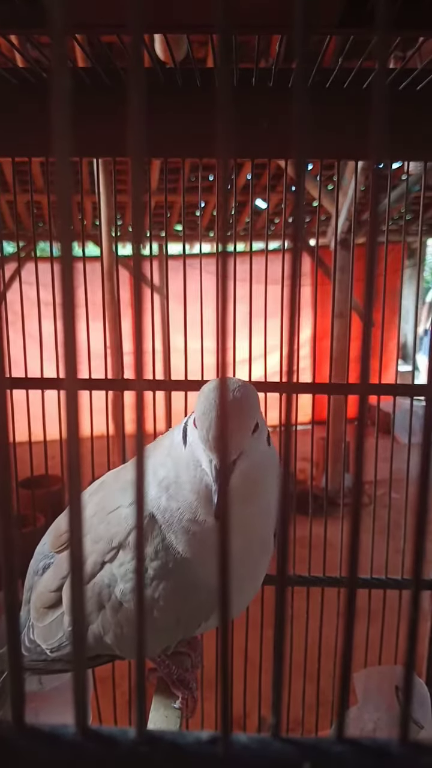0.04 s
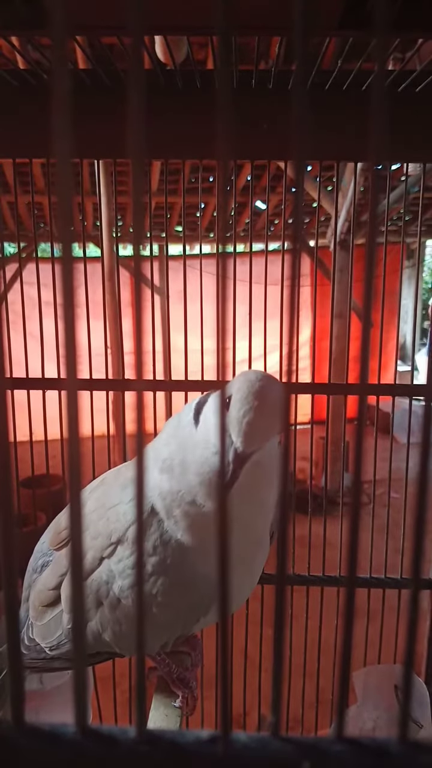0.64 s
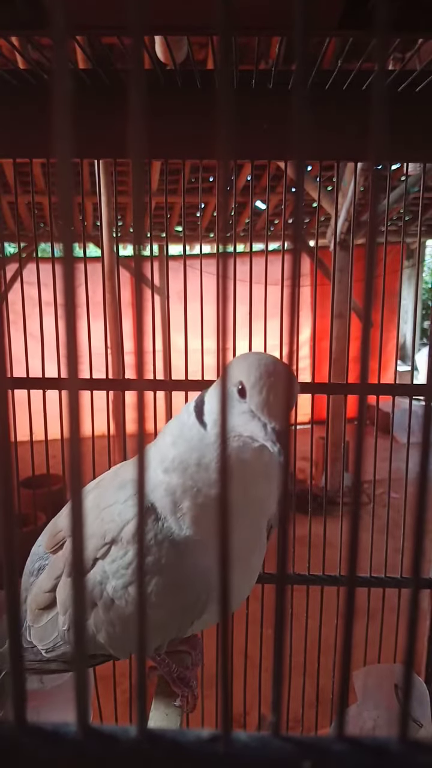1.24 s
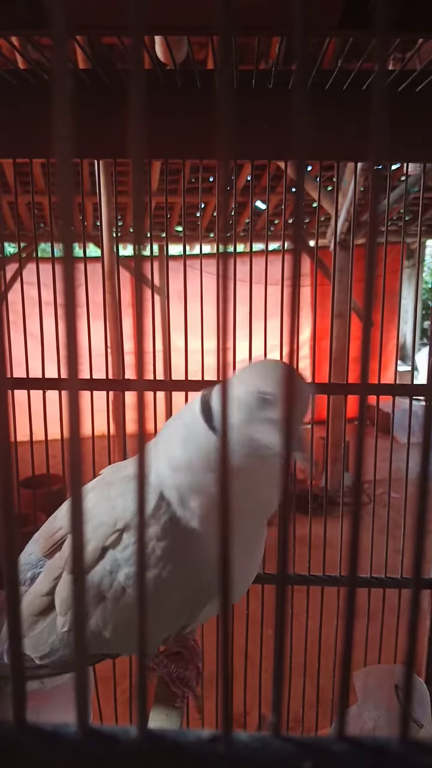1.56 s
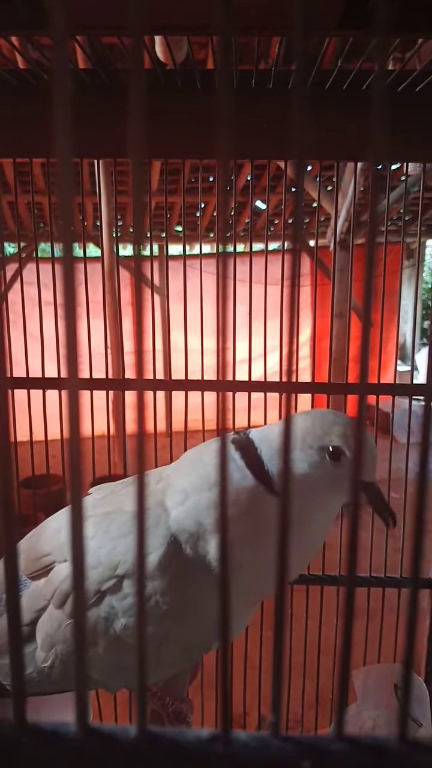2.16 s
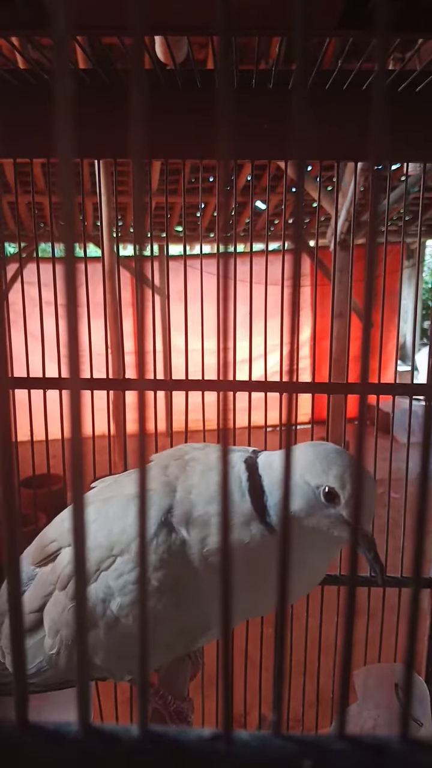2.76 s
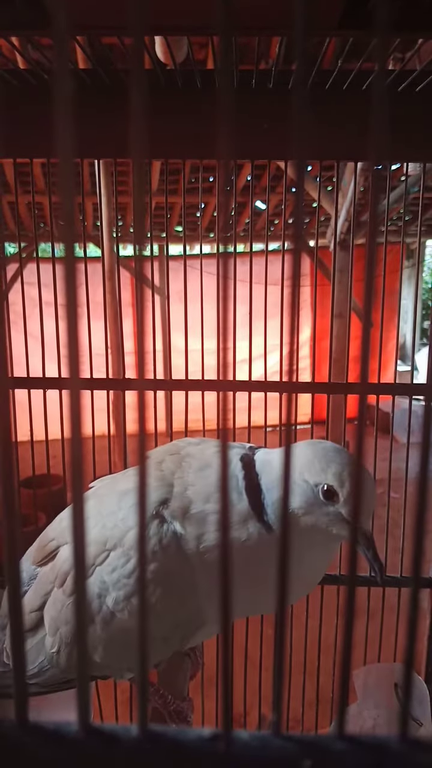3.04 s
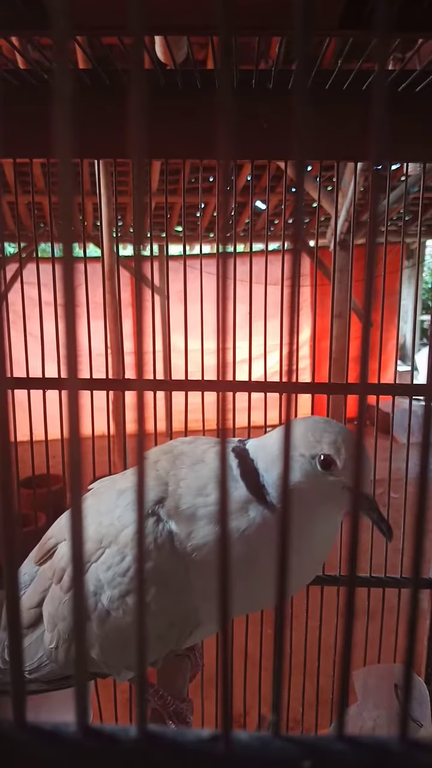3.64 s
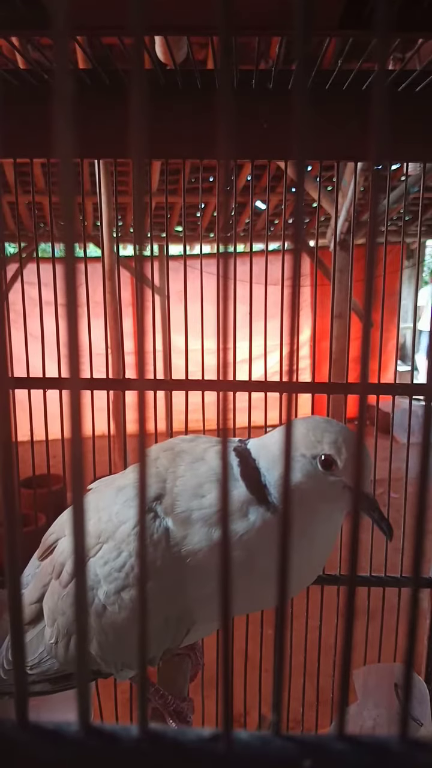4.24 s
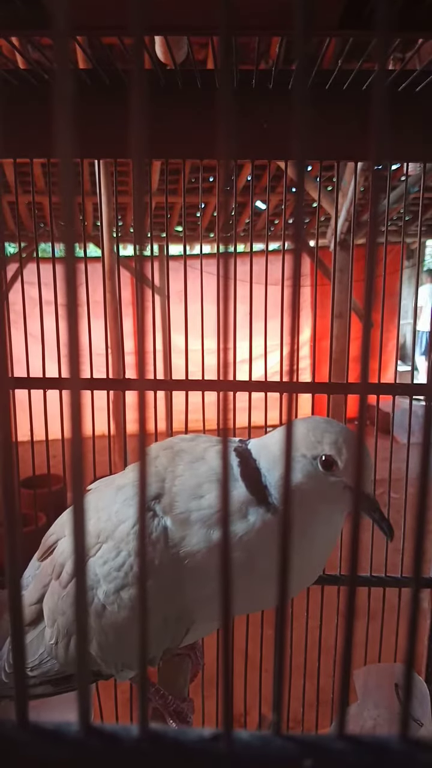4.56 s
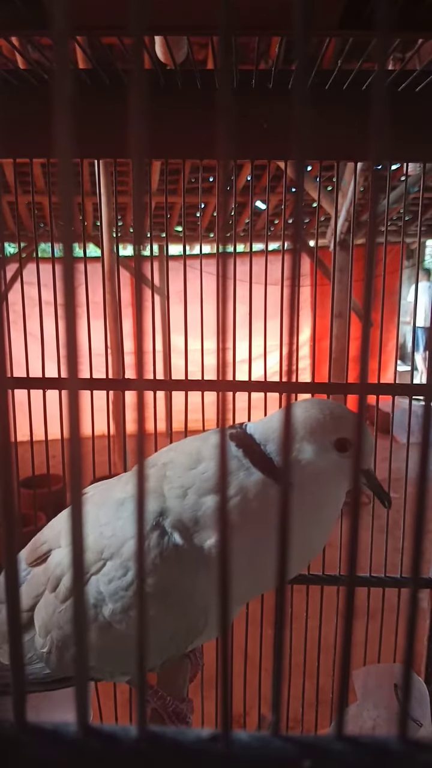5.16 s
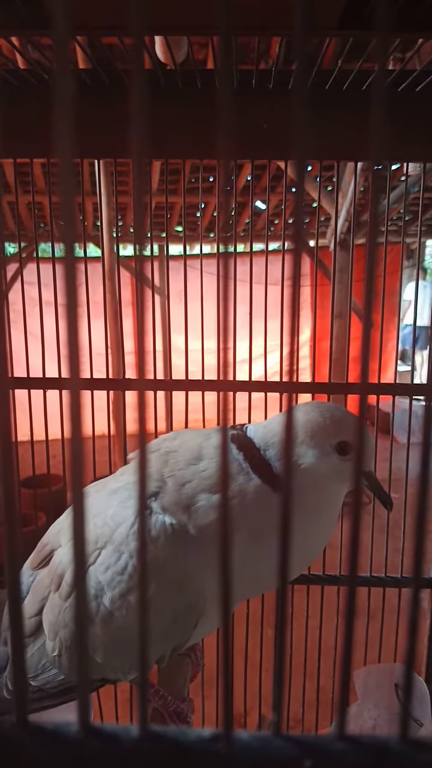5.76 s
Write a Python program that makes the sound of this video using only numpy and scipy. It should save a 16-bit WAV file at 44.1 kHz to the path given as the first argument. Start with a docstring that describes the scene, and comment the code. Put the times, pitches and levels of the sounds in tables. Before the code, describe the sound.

For the first two seconds the open shed is quiet: small birds chip, twitter and whistle a little way off, and something swishes like a broom, most clearly near 0.8 seconds. A distant engine hums faintly throughout over a low outdoor rumble. At about 2.4 seconds a caged dove, close and much louder than everything else, gives a short, round coo. A quick stutter follows around 3 seconds, then at 3.3 a long coo that breaks down at 3.7 into a low moan, sinking until about 4.6. At 5.1 comes another short coo, a stutter near 5.7, and the start of a long coo just before the end at 6 seconds. Three soft, dull knocks fall near 3.3, 4.5 and 5.8 seconds, the middle one clearest. Faint chirps and swishes continue behind the dove, whose voice has almost no echo.

```python
"""Small birds chirp and something swishes like a broom; a far engine hums throughout.
At 2.4 s a caged dove in an open shed gives a short coo, a stutter, then a long coo that breaks to a low moan.
Its nearly pure voice sounds through its inflated crop, a resonance that rings on at each leap of pitch.
From 5.1 s: another short coo, a stutter and the start of a long coo. Three dull knocks fall among the calls."""
import sys
import numpy as np
from scipy import signal
from scipy.fft import rfft, irfft, next_fast_len
from scipy.io import wavfile
from scipy.ndimage import uniform_filter1d, map_coordinates

SR = 44100
rng = np.random.default_rng(int(sys.argv[2]) if len(sys.argv) > 2 else 0)


def materialize(psi):
    """Save the field psi as 16-bit PCM at rate SR to the path in sys.argv[1].

    A 1-D psi becomes a single channel; in a 2-D psi each row is a channel.
    """
    bounded = np.clip(np.atleast_2d(psi).T, -1, 1)
    quanta = np.round(bounded * 32767).astype(np.int16)
    wavfile.write(sys.argv[1], SR, quanta)


N = 264776

# coos: leap t/s, hold/s, scoop/s, first f/Hz, last f/Hz, crest height/Hz, crest delay/s,
# crest half-width/s, effort/dB, swell/dB
COO_NOTES = [(2.453, .342, 0.036, 597, 551.3, 87, 0, .028, -13, 2.5),
             (3.332, 0.38, 0.046, 637, 603.3, 55.5, .035, 0.056, -15, 1.7),
             (5.151, .259, .025, 595.5, 560.8, 0, 0, .03, -14, 1.5),
             (5.953, .1, .029, 567, 579, 3, 0, .03, -15.5, 7)]
# stutter puffs: t/s, length/s, first f/Hz, effort/dB
PUFFS = [(2.792, 0.015, 391, -23), (3.041, .012, 376, -24), (3.074, .029, 385, -21.5),
         (3.116, .038, 376, -18.5), (3.18, 0.0098, 454, -17), (3.193, 0.047, 387, -16),
         (3.254, .023, 583, -14.5), (3.707, 0.013, 575, -13), (3.722, 0.01, 510, -12),
         (4.686, 0.0042, 400, -33), (5.405, .01, 424, -19.5), (5.694, 0.02, 420, -28),
         (5.729, 0.027, 396, -17), (5.778, 0.024, 523, -19), (5.828, .044, 559.6, -17),
         (5.894, 0.033, 551, -16)]
# overtone path through throat and neck: f/Hz, gain/dB
THROAT_GAIN = [(750, -42.5), (890, -37), (1020, -52.5), (1140, -42.5), (1250, -41), (1400, -40.5),
               (1600, -40.5), (1830, -45.5), (2020, -34), (2300, -43)]
# falling bird whistles: t/s, length/s, last f/Hz, level/dB
BIRD_WHISTLES = [(.491, 0.14, 3034, -44.5), (4.362, 0.12, 2984, -47), (5.214, 0.159, 3080, -41)]
# bird chips: t/s, middle f/Hz, level/dB
BIRD_CHIPS = [(.01, 3560, -56), (.979, 3590, -45.5), (1.202, 3490, -45.5), (1.313, 3490, -44),
              (1.368, 3250, -49), (1.77, 3120, -58), (2.835, 3160, -51.5), (4.76, 3770, -58),
              (3.523, 3150, -51.5)]
# broom-like sweeps: peak t/s, half-width/s, level/dB
SWEEP_STROKES = [(.765, .014, -41.5), (.83, .085, -41), (1.141, 0.064, -49.5), (2.119, 0.18, -50.5),
                 (2.59, 0.092, -44.5), (4.092, 0.086, -46.5), (5.5, 0.088, -46), (5.769, 0.095, -57)]
# lighter, brighter rustles: peak t/s, half-width/s, level/dB
RUSTLE_STROKES = [(.6, 0.11, -55.5), (1.02, 0.061, -55.5), (2.979, .038, -56), (3.31, 0.026, -57.5),
                  (3.41, 0.033, -54.5), (3.568, 0.085, -56.5), (3.831, 0.068, -57)]
# booms under some sweeps: peak t/s, half-width/s, level/dB
BOOM_STROKES = [(.835, .095, -42), (1.145, 0.051, -47), (2.165, .085, -48)]
# stroke body: f/Hz, relative density/dB
BODY_SPECTRUM = [(150, -27), (300, -8.5), (450, -11.5), (800, -10.5), (1050, -13), (1550, -7.5),
                 (2300, -14), (3500, -9), (5000, -26.5), (7000, -58)]
# stroke hiss: f/Hz, relative density/dB
HISS_SPECTRUM = [(2650, -26.5), (4500, -8), (6200, -7), (7400, -6), (8560, 3.5), (9200, -5.5),
                 (10000, -13.5), (11500, -12.5), (15500, -19.5)]
# stroke boom: f/Hz, relative density/dB
BOOM_SPECTRUM = [(40, -39), (120, -15.5), (182, -1), (240, -10), (400, -45)]
# dull knocks: t/s, level/dB
KNOCKS = [(3.267, -44), (4.453, -30), (5.791, -41)]
# far engine: t/s, f/Hz, level/dB
ENGINE_TRACK = [(0, 96.3, -55), (1, 94.2, -56), (1.6, 105, -70), (2.4, 109.7, -59.5), (3.2, 126.8, -67.5),
                (3.75, 143, -54.5), (4.1, 143.7, -54), (4.45, 143, -42.5), (4.7, 141.2, -51),
                (5.1, 136.9, -65), (6, 140.4, -55.5)]
# outdoor rumble: f/Hz, relative density/dB
RUMBLE_SPECTRUM = [(15, -74), (25, -19.5), (74, 3.5), (108, 6.5), (145, 6), (249, -3), (293, -19.5),
                   (413, -22.5), (454, -26), (600, -12.5), (780, -50.5), (1320, -120)]
# air hiss: f/Hz, relative density/dB
AIR_SPECTRUM = [(180, -28.5), (300, -1), (509, -7), (708, -9.5), (821, -9), (969, -10.5), (1050, -9.5),
                (1220, -9.5), (1560, -6.5), (3180, -11.5), (3630, -8.5), (5050, -24.5), (8430, -16),
                (9940, -27), (15500, -36)]
# shed reverberation: f/Hz, T60/s
SHED_DECAY = [(150, 0.33), (550, 0.77), (3000, 0.27), (10000, 0.49)]


def dove(crop_hz=490, crop_width_hz=45, moan_at_s=3.733):
    """The tone drives the crop, whose ring beats with it after each leap; overtones pass the throat."""
    voice = np.zeros((2, N))
    for leap_s, hold_s, scoop_s, *shape in COO_NOTES:
        add(voice, leap_s - scoop_s, coo(hold_s, scoop_s, *shape))
    add(voice, moan_at_s, moan())
    for start_s, *shape in PUFFS:
        add(voice, start_s, puff(*shape))
    tone, overtones = voice
    crop = filtered(tone, lambda f: resonance(f, crop_hz, crop_width_hz))
    return crop + filtered(overtones, lambda f: amp(along(THROAT_GAIN, f)))


def coo(hold_s, scoop_s, first_hz, last_hz, crest_hz, crest_delay_s, crest_width_s, db, swell_db,
        scoop_from_hz=372, scoop_to_hz=465.3, scoop_db=-13, landing_hz=593,
        attack_s=0.0057, crest_rise_s=0.024):
    """The voice scoops up in its low register, leaps to the high one, may overshoot, sags as it swells."""
    t = times(scoop_s + hold_s)
    held_s = t - scoop_s
    progress = held_s / hold_s
    low_hz = scoop_from_hz + (scoop_to_hz - scoop_from_hz) * (t / scoop_s) ** 1.4
    overshoot_hz = crest_hz * bell(held_s, crest_delay_s + crest_rise_s, crest_width_s)
    held_hz = last_hz + (first_hz - last_hz) * (1 - progress) ** 1.6 + overshoot_hz
    high_hz = leap(held_s - crest_delay_s, landing_hz, held_hz)
    high_db = db + swell_db * bell(progress, centre=0.7, half_width=0.28) + release_db(held_s, hold_s)
    envelope = (1 - np.exp(-t / attack_s)) * gate(t, scoop_s + hold_s, edge_s=0.0031)
    return envelope * syrinx(leap(held_s, low_hz, high_hz), leap(held_s, scoop_db, high_db))


def moan(length_s=0.912, first_hz=452.6, last_hz=354.7, peak_effort_db=-11.5, steady_share=0.55):
    """Low end of the long coo: sinks steadily, then droops faster as the effort fades."""
    t = times(length_s)
    progress = t / length_s
    droop = steady_share * progress + (1 - steady_share) * progress ** 4
    hz = first_hz + (last_hz - first_hz) * droop
    effort_db = peak_effort_db - 14 * (progress - 0.44) ** 2 + release_db(t, length_s)
    return gate(t, length_s, edge_s=0.003) * syrinx(hz, effort_db)


def puff(length_s, first_hz, db, rest_hz=417, relax_s=0.076, arch_db=7):
    """Rough stutter note, strongest mid-way; pitch relaxes towards rest."""
    t = times(length_s)
    hz = rest_hz + (first_hz - rest_hz) * np.exp(-t / relax_s)
    effort_db = db + arch_db * (0.4 - (2 * t / length_s - 1) ** 2)
    return gate(t, length_s, edge_s=0.0019) * syrinx(hz, effort_db, jitter=0.03, shimmer_db=0.5)


def syrinx(hz, effort_db, jitter=0.0045, shimmer_db=0.25, breath_db=-35):
    """Two rows: an unsteady, breathy tone and its overtones, richer at higher pitch."""
    phase = phase_of(hz * (1 + jitter * wobble(170, len(hz))))
    tone = np.sin(phase) + amp(breath_db) * rasp(hz, width_hz=209)
    third_db = -6 + 20 * np.log2(hz / 620)
    overtones = np.sin(2 * phase) + amp(third_db) * np.sin(3 * phase)
    gain = np.sqrt(2) * amp(effort_db + shimmer_db * wobble(140, len(hz)))
    return gain * np.array([tone, overtones])


def leap(t, before, after, switch_s=0.00084):
    """Abrupt step of the voice at t = 0, as in a change of register."""
    return before + (after - before) * (1 + np.tanh(t / switch_s)) / 2


def release_db(t, length_s, drop_db=7.5, fade_s=0.019):
    """Level drop as the air runs out at the end of a note."""
    return -drop_db * np.exp((t - length_s) / fade_s)


def cage(x, mode_hz=556, width_hz=8, mode_db=-13):
    """One narrow cage mode rings briefly after a coo near its pitch."""
    return x + amp(mode_db) * filtered(x, lambda f: resonance(f, mode_hz, width_hz))


def whistles(first_hz=4800, settle_s=0.024, flutter_hz=27):
    """Bird whistles start hoarse, swoop down and settle on a fluttering note."""
    song = np.zeros(N)
    for start_s, length_s, last_hz, db in BIRD_WHISTLES:
        t = times(length_s)
        swoop = np.exp(-t / settle_s)
        hz = last_hz + (first_hz - last_hz) * swoop
        flutter = 1 + 0.8 * np.cos(2 * np.pi * flutter_hz * t)
        clear = (1 - swoop) ** 2 * np.sin(phase_of(hz)) * flutter
        hoarse = np.sqrt(swoop) * rasp(hz, width_hz=1300)
        add(song, start_s, amp(db) * gate(t, length_s, edge_s=0.024) * (clear + hoarse))
    return song


def chips():
    """Bird chips: quick, raspy downward slides."""
    song = np.zeros(N)
    for start_s, hz, db in BIRD_CHIPS:
        add(song, start_s, amp(db) * slide(hz, fall_hz=646, width_hz=1192, length_s=0.07, edge_s=0.035))
    return song


def twitter(start_s=0.02, step_s=0.135, first_hz=6800, sink_hz=34.9, first_db=-58, fade_db=0.3):
    """One bird's high, even notes, each lower and softer than the last."""
    song = np.zeros(N)
    for k in range(8):
        note = slide(first_hz - k * sink_hz, fall_hz=100, width_hz=630, length_s=0.098, edge_s=0.049)
        add(song, start_s + k * step_s, amp(first_db - k * fade_db) * note)
    return song


def thin_whistle(middle_hz=5300, db=-71.5):
    """A far whistle that sinks slowly at the opening."""
    note = slide(middle_hz, fall_hz=300, width_hz=179, length_s=0.6, edge_s=0.025)
    return amp(db) * np.pad(note, (0, N - len(note)))


def slide(middle_hz, fall_hz, width_hz, length_s, edge_s):
    """Raspy bird note with a linear fall in pitch."""
    t = times(length_s)
    return gate(t, length_s, edge_s) * rasp(middle_hz + fall_hz * (0.5 - t / length_s), width_hz)


def swishes(sweep_hiss_db=-9.5, rustle_hiss_db=-3, grain_db=0.68):
    """Scratchy strokes catch and slip: hiss and dull body swell together, some over a boom."""
    sweep, rustle = swells(SWEEP_STROKES), swells(RUSTLE_STROKES)
    hiss = amp(sweep_hiss_db) * sweep * crackle(depth_db=1.0)
    hiss += amp(rustle_hiss_db) * rustle * crackle(depth_db=3.5)
    body = np.hypot(sweep, rustle) * noise(BODY_SPECTRUM, patchy_db=1.0)
    drag = amp(grain_db * (wobble(300) + 1.72 * wobble(35)))
    boom = swells(BOOM_STROKES) * noise(BOOM_SPECTRUM, patchy_db=5.0)
    return (hiss + body) * drag + boom


def crackle(depth_db):
    """Stroke hiss with a fast level flicker, rms 1."""
    return unit(noise(HISS_SPECTRUM, patchy_db=0.5) * amp(depth_db * wobble(900)))


def swells(strokes):
    """Gain of bell-shaped strokes, summed in power."""
    t = np.arange(N) / SR
    return np.sqrt(sum(amp(db) ** 2 * bell(t, peak_s, width_s) for peak_s, width_s, db in strokes))


def knocks(push_s=0.001):
    """Dull knocks: one low push and its rebound."""
    track = np.zeros(N)
    age = times(0.05) / push_s
    for start_s, db in KNOCKS:
        add(track, start_s, amp(db) * 2 * age * (2 - age) * np.exp(-age))
    return track


def engine(waver=0.0035):
    """Far hum: one tone, wavering in level and pitch."""
    track_s, track_hz, track_db = np.transpose(ENGINE_TRACK)
    t = np.arange(N) / SR
    db = np.interp(t, track_s, track_db) + wobble(11)
    hz = np.interp(t, track_s, track_hz) * (1 + waver * wobble(5.6))
    return np.sqrt(2) * amp(db) * np.sin(phase_of(hz))


def air(rumble_db=-53.5, hiss_db=-55.0):
    """Steady outdoor rumble and hiss."""
    rumble = amp(rumble_db) * noise(RUMBLE_SPECTRUM, patchy_db=1.0)
    return rumble + amp(hiss_db) * noise(AIR_SPECTRUM, patchy_db=2.63)


def shed(x, delay_s=0.01):
    """Diffuse reverberation; each frequency decays at its own rate."""
    hz, t, bins = signal.stft(rng.standard_normal(SR // 2), SR, nperseg=256)
    decay = amp(-60 * t / along(SHED_DECAY, hz)[:, None])
    tail = signal.istft(bins * decay, SR, nperseg=256)[1]
    impulse = np.pad(tail / np.linalg.norm(tail), (round(delay_s * SR), 0))
    return signal.fftconvolve(x, impulse)[:N]


def noise(spectrum, patchy_db):
    """Coloured noise, rms 1, with random gain patches in time and frequency."""
    bins = signal.stft(rng.standard_normal(N), nperseg=512)[2]
    patches = uniform_filter1d(rng.standard_normal(bins.shape), size=5, axis=0)
    patches = uniform_filter1d(patches, size=12, axis=1)
    patchy = signal.istft(bins * amp(patchy_db * unit(patches)), nperseg=512)[1][:N]
    return unit(filtered(patchy, lambda f: amp(along(spectrum, f))))


def rasp(hz, width_hz):
    """Noise band that follows a pitch curve, rms 1."""
    phase = phase_of(hz)
    return unit(wobble(width_hz, len(hz)) * np.sin(phase) + wobble(width_hz, len(hz)) * np.cos(phase))


def wobble(rate_hz, size=N):
    """Smooth random curve with knots at rate_hz."""
    knots = rng.standard_normal(int(size * rate_hz / SR) + 4)
    return map_coordinates(knots, [np.arange(size) * rate_hz / SR])


def resonance(f, centre_hz, width_hz):
    """Response of one damped mode, 1 at its centre."""
    return 1j * f * width_hz / (centre_hz ** 2 - f * f + 1j * f * width_hz)


def filtered(x, response):
    """x through a complex frequency response."""
    size = next_fast_len(N + SR // 2)
    return irfft(rfft(x, size) * response(np.fft.rfftfreq(size, 1 / SR)), size)[:N]


def along(points, hz):
    """(f/Hz, value) points read on a log axis."""
    f, values = np.transpose(points)
    return np.interp(np.log(hz + 1), np.log(f + 1), values)


def gate(t, length_s, edge_s):
    """Smooth window from 0 to length_s."""
    return np.sin(np.pi / 2 * np.clip(np.minimum(t, length_s - t) / edge_s, 0, 1)) ** 2


def bell(x, centre, half_width):
    """Gaussian, peak 1."""
    return np.exp(-((x - centre) / half_width) ** 2)


def add(track, start_s, x):
    """Mix x into track from start_s."""
    start = max(round(start_s * SR), 0)
    part = track[..., start:start + x.shape[-1]]
    part += x[..., :part.shape[-1]]


def times(length_s):
    """Sample times in s."""
    return np.arange(int(length_s * SR)) / SR


def phase_of(hz):
    """Running phase in rad."""
    return 2 * np.pi * np.cumsum(hz) / SR


def amp(db):
    """dB to gain."""
    return 10 ** (np.asarray(db) / 20)


def unit(x):
    """x at rms 1."""
    return x / np.sqrt(np.mean(x ** 2) + 1e-20)


def scene(near_reverb_db=-34, birds_direct_db=-2):
    """Dove and knocks close and nearly dry; small birds farther off."""
    near = cage(dove()) + knocks()
    far = whistles() + chips() + twitter() + thin_whistle()
    birds = amp(birds_direct_db) * far + shed(far)
    return near + amp(near_reverb_db) * shed(near) + birds + swishes() + engine() + air()


def record(dry, top_hz=15600):
    """Mono microphone, band-limited to top_hz."""
    return filtered(dry, lambda f: f < top_hz)[None]


dry = scene()
out = record(dry)
materialize(out)
```